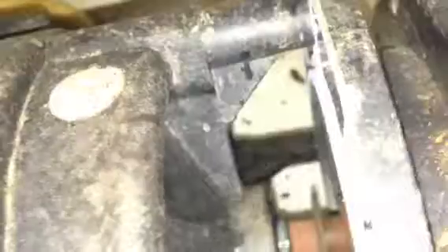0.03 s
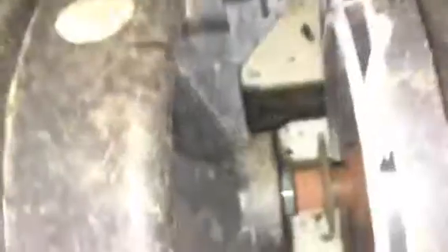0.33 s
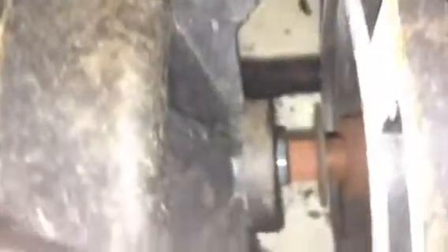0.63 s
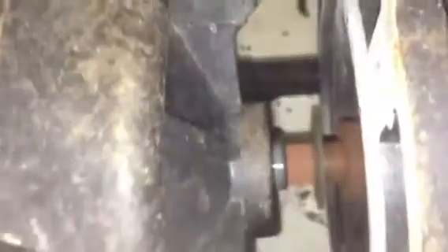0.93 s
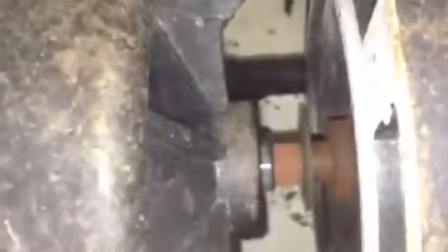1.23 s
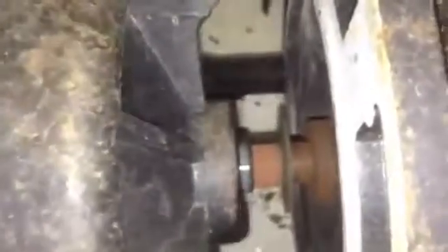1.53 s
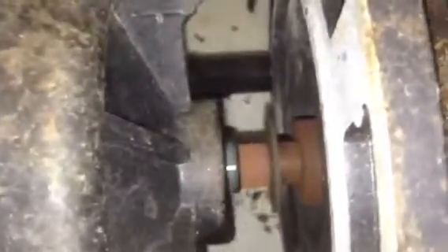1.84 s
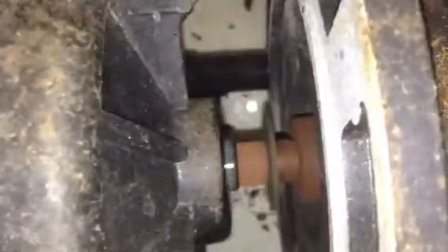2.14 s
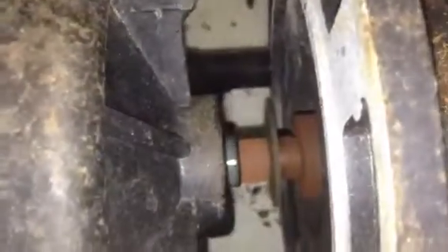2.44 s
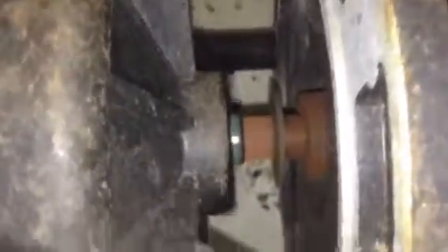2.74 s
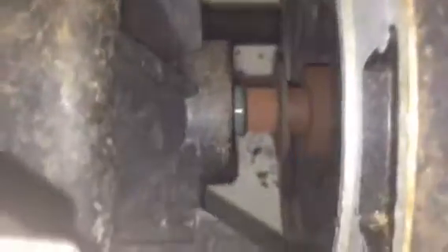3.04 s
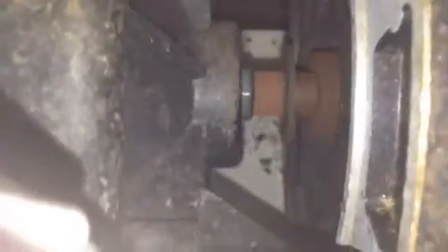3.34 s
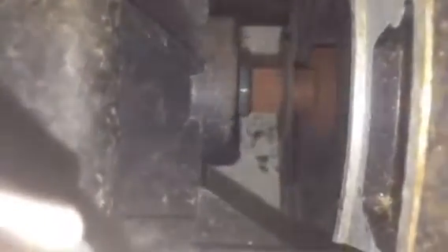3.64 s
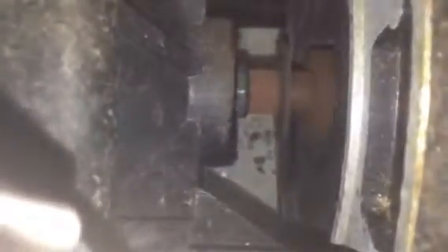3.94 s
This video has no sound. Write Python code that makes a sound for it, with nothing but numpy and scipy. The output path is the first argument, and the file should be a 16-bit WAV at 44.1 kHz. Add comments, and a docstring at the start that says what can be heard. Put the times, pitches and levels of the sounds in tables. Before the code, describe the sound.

An electric pump runs close by with a steady low hum and rattling rush.

```python
"""The steady hum and rush of an electric pump, with casing rattle and air buffets throughout.
The motor hums at twice the mains rate; fan and impeller sing at multiples of the shaft rate.
Bearings and water rattle the cast casing. Cooling air rushes past and buffets the single microphone,
which is a hand's width from the shaft coupling and drifts slowly along the machine."""
import sys
import numpy as np
from scipy import signal
from scipy.io import wavfile

SR = 44100
rng = np.random.default_rng(int(sys.argv[2]) if len(sys.argv) > 2 else 0)


def bounce(signal):
    """Save signal as a 16-bit WAV file at the path given by the first command-line argument."""
    frames = np.transpose(np.atleast_2d(signal))
    limited = np.clip(frames, -1, 1)
    pcm = np.round(limited * 32767).astype(np.int16)
    wavfile.write(sys.argv[1], SR, pcm)


N = 176400
TIME = np.arange(N) / SR
START_S = .1202   # silent until here

MAINS_HZ, SHAFT_HZ, SHAFT_WANDER_HZ = 50, 47.54, 0.024
# the motor's magnetic hum: multiple of the mains rate, level/dB
HUM_TONES = [(2, -26.5), (4, -34)]
# fan and impeller tones: multiple of the shaft rate, level/dB
BLADE_TONES = [(1, -59), (7, -53), (12, -34), (14, -42.5), (21, -45.5), (24, -61)]
# how those tones rise and fall together: t/s, level/dB
BLADE_LEVEL = [(.12, 0), (.55, -4.5), (.95, 2), (1.15, -8), (1.4, 0), (1.55, 7.5), (1.76, 7), (1.85, -5.5),
               (2.1, 6), (2.19, 0), (2.28, 6), (2.37, -5), (2.5, 6.5), (2.64, -8), (2.78, -2), (2.89, 6),
               (3.08, 5), (3.3, 4), (3.65, 2.5), (4, 4.5)]

CASING_DB, RATTLES_PER_S, RATTLE_SPREAD_DB = -20.5, 9000, 2.5
# strength of the whole rattle: t/s, level/dB
RATTLE_LEVEL = [(.12, -0.5), (.3, 0.3), (1.4, .4), (2.1, -0.75), (3.2, -1), (4, -1.9)]
# lesser casing rings, fading or growing as the microphone drifts:
# f/Hz, width/Hz, level halfway through/dB, change/(dB per s)
LESSER_RINGS = [(595, 50, -1, -2.5), (692, 56, -21, 7), (950, 59, -6, 1), (1224, 134, -4, 2.2),
                (1577, 88, 0.5, 1.1), (1920, 60, -10, 1.5), (2183, 135, -2, 2), (2524, 47, -11.5, -2),
                (2693, 43, -7, -0.5), (2940, 130, -4, 4), (3570, 100, -8, 2), (4255, 420, -1, 2.5),
                (4600, 190, -4, 1), (4950, 230, -7, 4.5), (6000, 420, -5.5, 1), (7220, 1200, -11, -3)]
# uneven swells of the three strongest rings, low, middle and high: t/s, level/dB
LOW_RING = [(.12, 1), (.27, 3), (.55, -0.5), (.72, 5.5), (.8, -1), (.96, 6), (1.08, -2), (1.27, 1),
            (1.35, 5), (1.52, -7), (2.05, 0), (2.38, 0), (2.48, -11), (2.58, 7), (2.7, -4), (2.98, 5),
            (3.33, -5), (3.67, 4.5), (3.79, -6), (3.93, 2), (4, 4)]
MIDDLE_RING = [(.12, -3), (.45, -3), (.72, 0), (.87, -9), (.97, 2), (1.15, -8), (1.43, 6), (1.8, 0.5),
               (1.9, -9), (2.12, 0), (2.28, -6), (2.4, 3), (2.54, -18), (2.68, 8), (2.79, -8), (2.93, 1),
               (3.3, -9), (3.45, 6.5), (3.62, -2), (3.78, 4), (4, 4)]
HIGH_RING = [(.12, -3), (.6, -1.5), (.88, -2.5), (1.12, 4), (1.23, -4), (1.42, -2), (1.65, -3.5),
             (1.86, 2.5), (2.03, -1.5), (2.18, 1), (2.6, -0.5), (2.92, 2.5), (3.3, 0), (3.5, 3.5),
             (3.59, -4), (3.78, 4), (3.88, -3), (4, 0)]
# hiss near 5.5 kHz, weakest around the middle: t/s, level/dB
HISS_LEVEL = [(.12, 7), (.7, 5), (.85, -3), (1.4, -3), (2.3, -16), (2.9, -1), (3.3, -1), (3.64, 12),
              (3.82, -1), (4, 2)]
# the thin topmost ring: t/s, level/dB
TOP_RING = [(.12, -4), (1.25, 0), (1.48, 7), (1.8, -1), (2.4, 1), (2.88, 2), (3.1, -5), (4, -4)]
# the casing rings that follow those five curves: f/Hz, width/Hz, level/dB, swell curve
SWELLING_RINGS = [(1826.5, 57, 2, LOW_RING), (2318, 52, 2, MIDDLE_RING), (3964, 87, 1, HIGH_RING),
                  (5550, 570, -12, HISS_LEVEL), (9360, 380, -18, TOP_RING)]

# rush of the cooling air, from bass to treble: f/Hz, level/dB
RUSH_SPECTRUM = [(60, -15), (150, 2.5), (350, -6.5), (620, 1.5), (850, -2.5), (1400, -3.5), (2100, 0),
                 (2700, -5), (3400, -3.5), (4500, -10.5), (5400, -14), (7000, -16.5), (10000, -22),
                 (15500, -30.5)]
# narrow dips in that rush: f/Hz, width/Hz
RUSH_DIPS = [(1385, 30), (2590, 80), (2755, 140), (3380, 20)]

RUMBLE_DB, TURBULENCE_DB, EDDIES_PER_S = -4.5, 5, 64
RUMBLE_SPLIT_HZ, MIC_LOW_CUT_HZ = 144, 31   # deep rumble lies below the split, upper rumble above
# rumble of air on the microphone: f/Hz, level/dB
RUMBLE_SPECTRUM = [(20, -30), (35, -24), (55, -13), (80, -1), (120, -2), (165, -11.5), (240, -6.5),
                   (330, -14), (500, -7.5), (900, -22), (2000, -29)]
# how that rumble comes and goes: t/s, deep level/dB, upper level/dB
RUMBLE_LEVELS = [(.12, -9, -31), (.21, -17, -19), (.36, -22, -23), (.66, -12, -17.5), (.85, -18, -25),
                 (.95, -19, -23), (1.05, -19, -19.5), (1.22, -19, -18), (1.5, -19.5, -19), (1.72, -17, -19),
                 (1.9, -16.5, -21), (2.1, -22, -16), (2.3, -15.5, -20), (2.48, -20, -17),
                 (2.8, -17.5, -18.5), (3.2, -16.5, -21), (3.44, -21.5, -28), (3.56, -16.5, -19.5),
                 (3.66, -32, -20.5), (3.77, -15, -20), (4, -24, -20.5)]

PUSH_CYCLES, WAKE_S = 0.37, 0.0097   # half-lengths of a buffet's push and of its wake
WAKE_DB, WAKE_SPAN = -12, 2.27   # span: the wake's top frequency divided by its centre
# the strongest buffets of air: t/s, level/dB, centre f/Hz
BUFFETS = [(0.177, -7.5, 380), (.188, -10, 240), (0.231, -10, 260), (0.402, -14, 200), (0.458, -17, 420),
           (0.567, -11.5, 110), (0.649, -14, 300), (.675, -12, 78), (0.751, -7.5, 104.6),
           (.976, -10, 221.6), (1.012, -8.5, 143), (1.056, -11, 78.2), (1.089, -15, 81.1),
           (1.164, -11.5, 284), (1.29, -22, 112.4), (1.336, -12.5, 91.5), (1.474, -9, 205),
           (1.538, -8.5, 134.6), (1.673, -9, 120), (1.708, -12, 82.4), (1.776, -13.5, 151),
           (1.833, -7, 77.7), (1.895, -11, 179), (2.022, -7.5, 215), (2.072, -13, 284), (2.236, -17, 253),
           (2.264, -7, 180), (2.347, -17, 101.3), (2.431, -15, 158.8), (2.62, -14, 90.2), (2.675, -10, 202),
           (2.712, -11, 181), (2.792, -10, 179.3), (2.85, -10.5, 172), (2.882, -5.5, 550),
           (2.931, -23, 128), (3.122, -19, 111.7), (3.155, -8.5, 380), (3.352, -13, 418), (3.554, -18, 90),
           (3.702, -17, 162), (3.764, -8, 109.5), (3.944, -16, 142)]

TREBLE_HZ = 6500
# tone colour as the microphone drifts: t/s, level below the treble/dB, treble level/dB
MIC_COLOUR = [(.12, -0.5, 0.5), (.62, 0.5, 0.2), (.84, -1, -.7), (1.0, -1.5, 1), (1.22, -0.7, -2.5),
              (1.45, 0, -1), (1.8, 1.1, 2), (2.4, 0.2, 1), (2.85, -0.1, 1.5), (3.05, -1.1, -0.3),
              (3.3, 0.4, -1.3), (4, -0.55, -0.6)]


def from_db(db):
    """Turn decibels into a number to multiply by."""
    return 10 ** (np.asarray(db) / 20)


def unit_power(x):
    """Scale a signal so that its average power is 1."""
    return x / np.sqrt(np.mean(x ** 2) + 1e-20)


def curves(rows):
    """Join a table's points with straight lines, one curve for each level column."""
    times, *columns = np.transpose(rows)
    return [np.interp(TIME, times, column) for column in columns]


def drift(rate_hz):
    """Smooth random wandering of typical size 1; a higher rate moves faster."""
    step, settle = 40, 2000   # one value every 40 samples; skip the filter's start-up
    pole = np.exp(-2 * np.pi * step * rate_hz / SR)
    noise = rng.standard_normal(N // step + settle + 2)
    slow = signal.lfilter([1], [1, -2 * pole, pole * pole], noise)[settle:]
    return np.interp(np.arange(N) / step, np.arange(len(slow)), unit_power(slow - slow.mean()))


def gentle_filter(x, hz, kind):
    """Keep the "low" side, the "high" side or a "band" of a sound."""
    return signal.sosfilt(signal.butter(2, hz, kind, fs=SR, output="sos"), x)


def flickering_noise(spectrum, flicker_db):
    """Noise in bands a third of an octave wide, each flickering on its own."""
    hz, db = np.transpose(spectrum)
    edges = 20 * 2 ** (np.arange(30) / 3)
    white, out = rng.standard_normal((3, N)), 0
    for k, (low, high) in enumerate(zip(edges, edges[1:])):
        if low < hz[-1]:
            level_db = np.interp(np.log(low * high) / 2, np.log(hz), db)
            band = gentle_filter(white[k % 3], [low, high], "band")
            out += from_db(level_db + flicker_db * drift(26)) * band
    return unit_power(out)


def tones(turns, table, waver_db):
    """Pure tones at whole multiples of one rate, each wavering in level."""
    out = 0
    for multiple, db in table:
        peak = np.sqrt(2) * from_db(db + waver_db * drift(2.5))
        out += peak * np.sin(2 * np.pi * (multiple * turns + rng.random()))
    return out


def motor_hum(flutter_db=1.5):
    """The motor's magnetism hums in step with the mains; the level flutters."""
    hum = tones(MAINS_HZ * TIME, HUM_TONES, waver_db=-0.5)
    return hum * from_db(flutter_db * drift(6.2))


def blade_song():
    """Fan and impeller sing on a shaft whose speed wanders slightly."""
    shaft_turns = np.cumsum(SHAFT_HZ + SHAFT_WANDER_HZ * drift(2.0)) / SR
    blade_db, = curves(BLADE_LEVEL)
    return from_db(blade_db) * tones(shaft_turns, BLADE_TONES, waver_db=2.1)


def ring(x, hz, width_hz):
    """Make a sound ring at one pitch; a smaller width rings longer."""
    pole = np.exp(-np.pi * width_hz / SR)
    return signal.lfilter([1, 0, -1], [1, -2 * pole * np.cos(2 * np.pi * hz / SR), pole * pole], x)


def casing_rattle(swell_db=1.6, flutter_db=1.5):
    """Countless tiny knocks from bearings and water set the casing ringing."""
    hits = rng.random(N) < RATTLES_PER_S / SR
    knocks = hits * from_db(RATTLE_SPREAD_DB * np.minimum(rng.exponential(1, N), 4))
    rings = []
    for hz, width, db, db_per_s in LESSER_RINGS:
        rings.append((hz, width, db + db_per_s * (TIME - TIME.mean()) + swell_db * drift(1.7)))
    for hz, width, db, swell in SWELLING_RINGS:
        rings.append((hz, width, db + curves(swell)[0] + flutter_db * drift(27)))
    ringing = 0
    for hz, width, db in rings:
        ringing += from_db(db) * unit_power(ring(knocks * rng.standard_normal(N), hz, width))
    rattle_db, = curves(RATTLE_LEVEL)
    return from_db(CASING_DB + rattle_db) * unit_power(ringing)


def air_rush(level_db=-22):
    """Cooling air makes a broad rush with a few narrow dips in its spectrum."""
    rush = flickering_noise(RUSH_SPECTRUM, flicker_db=1.8)
    for hz, width in RUSH_DIPS:
        rush = signal.lfilter(*signal.iirnotch(hz, hz / width, fs=SR), rush)
    return from_db(level_db) * rush


def draught():
    """Swirling air rumbles and thumps on the microphone, which weakens the lowest bass."""
    noise = flickering_noise(RUMBLE_SPECTRUM, flicker_db=1.5)
    churn = from_db(TURBULENCE_DB * np.clip(drift(EDDIES_PER_S), -2, 2))
    rumble = unit_power(noise * churn)
    deep = signal.sosfiltfilt(signal.butter(3, RUMBLE_SPLIT_HZ, fs=SR, output="sos"), rumble)
    upper = rumble - deep + small_eddies()
    deep_db, upper_db = curves(RUMBLE_LEVELS)
    wind = from_db(RUMBLE_DB) * (from_db(deep_db) * deep + from_db(upper_db) * upper)
    return gentle_filter(wind + buffets(), MIC_LOW_CUT_HZ, "high")


def small_eddies(per_s=45, band_hz=(180, 430), relative_db=-11.5):
    """Small swirls of air land as an uneven patter of dull knocks."""
    knocks = (rng.random(N) < per_s / SR) * rng.choice([-1, 1], N)
    return from_db(relative_db) * unit_power(gentle_filter(knocks + 1e-18, band_hz, "band"))


def bump(at_s, half_length_s):
    """A smooth rise to 1 and back around one moment."""
    return np.exp(-np.minimum(((TIME - at_s) / half_length_s) ** 2 / 2, 20))


def buffets(dull_above_hz=650):
    """Each big swirl of air lands as one swing of pressure inside a short churning wake."""
    out = 0
    for at_s, db, hz in BUFFETS:
        push = bump(at_s, PUSH_CYCLES / hz) * np.sin(2 * np.pi * (hz * TIME + rng.random()))
        churn = gentle_filter(rng.standard_normal(N), [hz / WAKE_SPAN, hz * WAKE_SPAN], "band")
        wake = bump(at_s, WAKE_S) * unit_power(churn)
        out += from_db(db) * (push + from_db(WAKE_DB) * wake)
    return gentle_filter(out, dull_above_hz, "low")


def scene():
    """Tones, machine noise coloured by the microphone's place, and draught; both channels alike."""
    pump_tones = motor_hum() + blade_song()
    noise = casing_rattle() + air_rush()
    treble = signal.sosfiltfilt(signal.butter(2, TREBLE_HZ, "high", fs=SR, output="sos"), noise)
    body_db, treble_db = curves(MIC_COLOUR)
    coloured = from_db(body_db) * (noise - treble) + from_db(treble_db) * treble
    sound = pump_tones + coloured + draught()
    return np.array([sound, sound])


def record(dry):
    """The sound cuts in, its peaks are rounded and the highest treble is removed."""
    rounded = 1.248 * np.tanh(dry * (TIME >= START_S) / 1.154)
    return signal.sosfilt(signal.ellip(12, .1, 90, 15350, fs=SR, output="sos"), rounded)


dry = scene()
out = record(dry)
bounce(out)
```